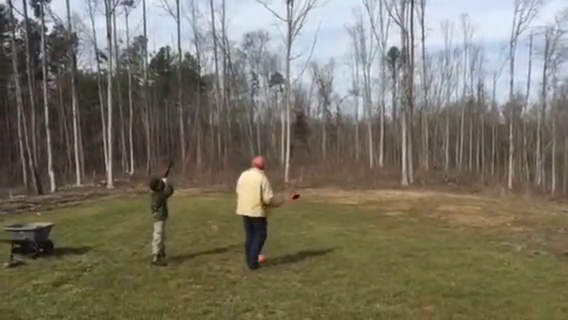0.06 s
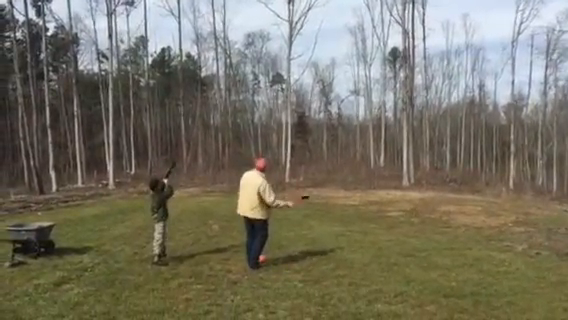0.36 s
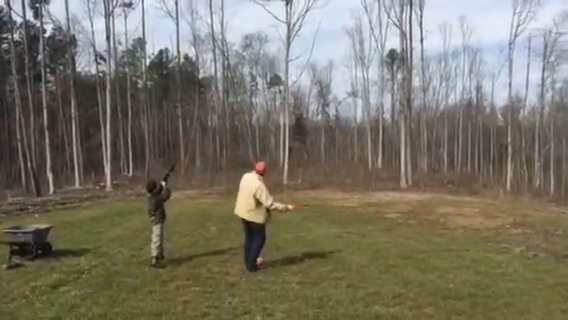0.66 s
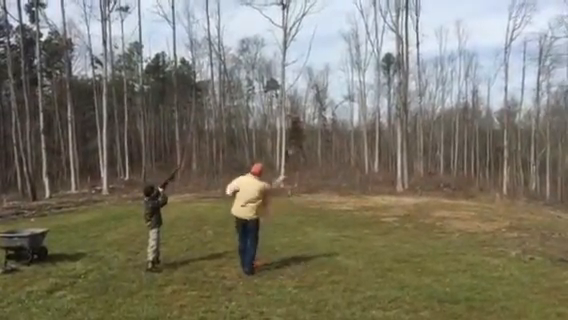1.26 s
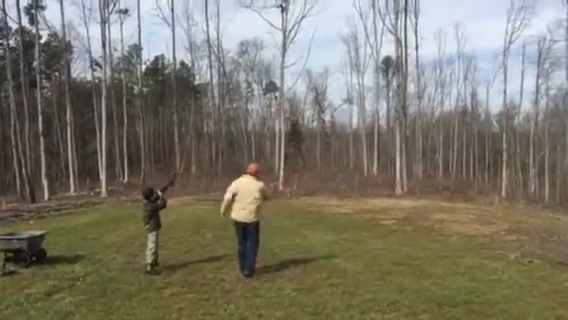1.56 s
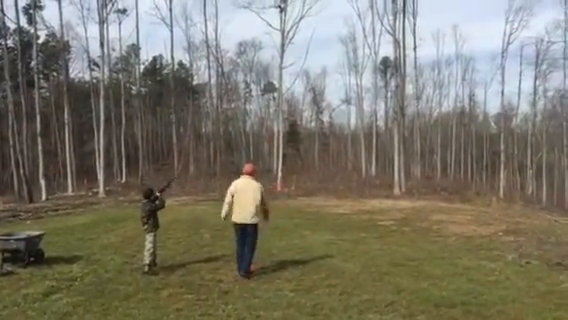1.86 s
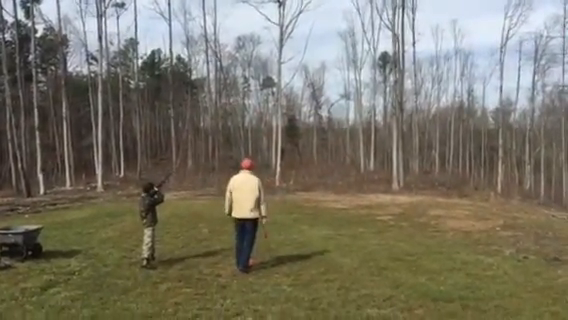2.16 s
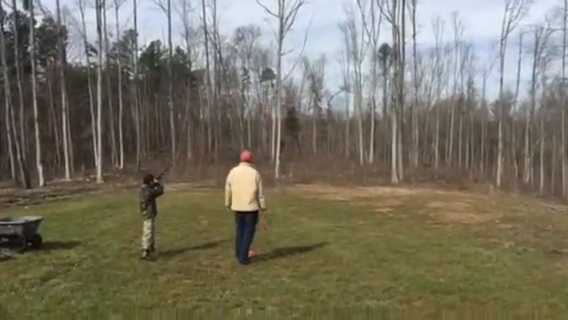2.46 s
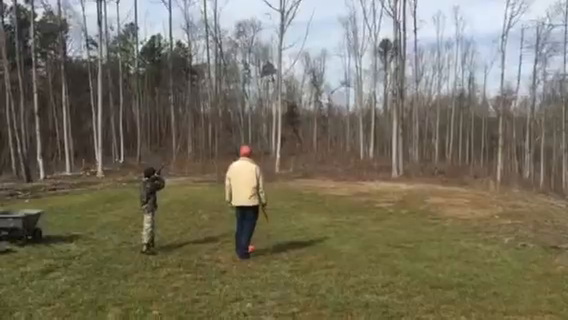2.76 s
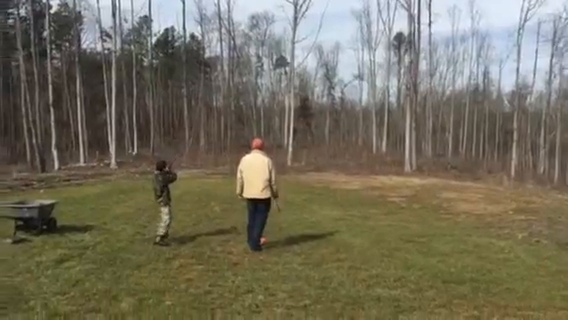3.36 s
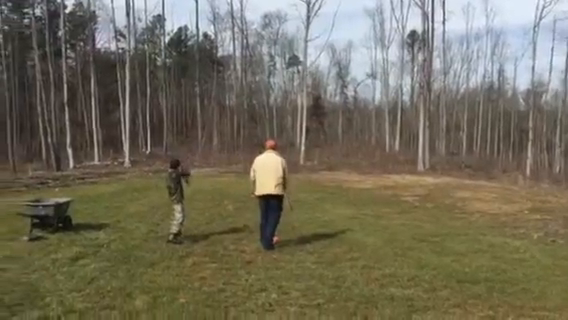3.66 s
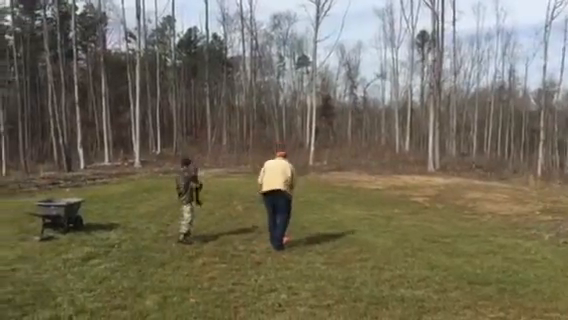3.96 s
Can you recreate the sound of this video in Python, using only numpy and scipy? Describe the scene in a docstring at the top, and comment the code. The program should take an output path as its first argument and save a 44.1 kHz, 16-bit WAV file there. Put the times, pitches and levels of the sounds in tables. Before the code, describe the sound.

A shotgun fires once in a clearing by woods. Before it come light wind, a distant rush and the faint snap of a clay thrower. The blast overloads the microphone, then echoes away through the trees.

```python
"""One shotgun shot in a grass clearing ringed by bare woods.
First come light wind, a far rush with a whine in it, and a tiny bird chirp. At 1.3 s a hand thrower
snaps a clay disc free, and the bird chirps again. At 3.1 s the blast overloads the microphone.
Grass and brush scatter it, the nearest trees slap it back, and then it rolls away through the woods,
ever duller, with a few faint ticks near the end."""
import sys
import numpy as np
from scipy import signal
from scipy.fft import rfft, irfft
from scipy.io import wavfile

SR = 44100
rng = np.random.default_rng(int(sys.argv[2]) if len(sys.argv) > 2 else 0)


def log_audio(samples):
    """Write samples as a 16-bit WAV file to the path given in sys.argv[1]."""
    # one column per channel
    frames = np.atleast_2d(samples).T
    # limit to full scale, then quantise
    limited = np.clip(frames, -1, 1)
    pcm = np.round(limited * 32767).astype(np.int16)
    wavfile.write(sys.argv[1], SR, pcm)


N = 176400   # 4 seconds
TIME = np.arange(N) / SR
SHOT_S = 3.0964   # the shock front arrives


def from_db(db):
    """Turn decibels into a gain."""
    return 10 ** (np.asarray(db) / 20)


def at_hz(points, hz):
    """Read between the rows of a table, on a log frequency scale."""
    return np.interp(np.log(hz + 1e-9), *np.transpose([(np.log(f), v) for f, v in points]))


def noise(spectrum):
    """Noise with the given level per Hz."""
    gain = from_db(at_hz(spectrum, np.arange(N // 2 + 1) * SR / N))
    return irfft(rfft(rng.standard_normal(N)) * gain, N) * np.sqrt(SR / 2)


def unit_power(x):
    """Scale a signal to an average power of 1."""
    return x / np.sqrt(np.mean(x ** 2) + 1e-20)


def drift(rate_hz, step=40):
    """A smooth random wobble, about 1 in size."""
    pole = np.exp(-2 * np.pi * rate_hz * step / SR)
    draws = rng.standard_normal((N + SR) // step)
    slow = signal.lfilter([1], [1, -2 * pole, pole * pole], draws)[SR // step:]
    return np.interp(TIME, np.arange(len(slow)) * step / SR, unit_power(slow))


def since(start):
    """Seconds since a moment, zero before it."""
    return np.maximum(TIME - start, 0)


def burst(start, fade, rise=1e-4, hold=0):
    """A level that rises, then falls once `hold` is over. A fade time is the seconds to fall 60 dB."""
    fall = np.exp(-np.minimum(np.log(1000) * since(start + hold) / fade, 50))
    return np.minimum(since(start) / rise, 1) * fall


def ring(start, hz, fade):
    """A tone that starts sharply and dies away."""
    return burst(start, fade) * np.sin(2 * np.pi * hz * since(start))


def bands(spectrum):
    """Yield noise in half-octave bands, each with its centre in Hz."""
    edges = np.geomspace(30, 17000, 19)
    sources = noise(spectrum), noise(spectrum)
    for k, (low, high) in enumerate(zip(edges, edges[1:])):
        band_pass = signal.butter(2, [low, high], "band", fs=SR, output="sos")
        yield np.sqrt(low * high), signal.sosfilt(band_pass, sources[k % 2])


# The tone of the crack. Each row: frequency in Hz, relative level in dB.
CRACK_TONE = [(150, -24.5), (280, 4.5), (420, -2.5), (700, 3), (1200, -5), (2200, -3.5), (3500, -7),
              (7000, -18.5), (16000, -24.5)]
# Low ringing behind the crack. Each row: pitch in Hz, level in dB, fade time in seconds.
LOW_RINGS = [(420, -7, 0.019), (240, -8, .05)]

def blast():
    """A ragged shock front cracks, then a deep pressure swing slows as it dies."""
    crack = from_db(11) * unit_power(noise(CRACK_TONE)) * burst(SHOT_S, fade=0.0072, hold=0.0029)
    suction_s = 3.1004   # the pressure swings below rest
    start_hz, end_hz, sag_s = 182, 52, 0.0041
    age = since(suction_s)
    cycles = end_hz * age + (start_hz - end_hz) * sag_s * (1 - np.exp(-age / sag_s))
    boom = -from_db(6.5) * burst(suction_s, fade=0.043) * np.sin(2 * np.pi * cycles)
    ringing = sum(from_db(db) * ring(suction_s, hz, fade) for hz, db, fade in LOW_RINGS)
    return crack + boom + ringing


# Two dry ticks. Each row: start in seconds, level in dB, fade time in seconds.
DRY_TICKS = [(3.0743, -25, 0.0083), (3.078, -36.5, 0.0058)]
# Short dull swells. Each row: middle in seconds, pitch in Hz, half length in seconds, level in dB.
SWELLS = [(3.0876, 740, 0.003, -11), (3.0874, 173, 0.0037, -20), (3.0942, 170, 0.0065, -14.5)]
# The tones of the ticks and the rasp. Each row: frequency in Hz, relative level in dB.
TICK_TONE = [(200, -7), (800, 4), (2000, -1.5), (4000, -2.5), (6500, -10.5), (16000, -17.5)]
RASP_TONE = [(100, -18.5), (450, 2), (900, 0.5), (2000, -9), (5000, -20.5), (16000, -37.5)]

def blast_onset():
    """Just ahead of the crack come two ticks, dull swells and a rasp that grows into it."""
    tick_level = sum(from_db(db) * burst(start, fade, hold=0.0007) for start, db, fade in DRY_TICKS)
    ticks = unit_power(noise(TICK_TONE)) * tick_level
    swells = np.zeros(N)
    for middle, hz, half_length, db in SWELLS:
        offset = TIME - middle
        swells += from_db(db) * np.exp(-(offset / half_length) ** 2) * np.cos(2 * np.pi * hz * offset)
    rasp_level = from_db(-16.5) * np.exp(-np.abs(TIME - SHOT_S) / 0.0063)
    return ticks + swells + rasp_level * unit_power(noise(RASP_TONE))


# The tone of sound sprayed back by the ground. Each row: frequency in Hz, relative level in dB.
SPRAY_TONE = [(50, -19), (200, -7.5), (420, 10), (700, 2), (1100, -9.5), (2500, -3), (6000, -5.5),
              (16000, -18.5)]
# Scatter from grass and brush close by. Each row: frequency in Hz, starting level in dB per Hz.
SCATTER_TONE = [(50, -80), (250, -61), (450, -56), (900, -53.5), (1500, -47.5), (2500, -49), (5000, -58),
                (10000, -64), (16000, -66)]
# How long that scatter lasts. Each row: frequency in Hz, fade time in seconds.
SCATTER_FADES = [(100, .6), (800, 0.65), (2000, 0.24), (5000, 0.31), (15000, 0.21)]

def clearing():
    """Ground, grass and brush scatter the blast; the treble dies first."""
    rise_s = 0.011
    ground_level = from_db(-3.5) * burst(SHOT_S, fade=0.079, rise=rise_s)
    brush_level = from_db(-39) * burst(SHOT_S, fade=1.0, hold=0.13)
    spray = (ground_level + brush_level) * unit_power(noise(SPRAY_TONE))
    return spray + sum(band * burst(SHOT_S, at_hz(SCATTER_FADES, hz), rise_s)
                       for hz, band in bands(SCATTER_TONE))


# Echoes from the nearest trees.
# Each row: start in seconds, slap level in dB, thump level in dB, slap fade time in seconds.
TREE_ECHOES = [(3.176, -23.5, -38, .025), (3.205, -24.5, -30, .02), (3.2605, -23, -31, 0.023),
               (3.2636, -16, -43, 0.04), (3.269, -33, -15.5, 0.044), (3.2872, -19, -43, 0.039),
               (3.3028, -11, -12, 0.015), (3.3078, -16, -19, 0.031), (3.3408, -15, -26, 0.031),
               (3.362, -20, -28, 0.035), (3.3719, -16, -19, 0.029), (3.384, -22, -18, 0.02),
               (3.4159, -19.5, -32, .04), (3.43, -23, -29, .04), (3.4469, -22, -36, 0.039),
               (3.454, -20, -44, 0.039), (3.52, -24, -33, 0.034), (3.7175, -30.5, -32, 0.056),
               (3.843, -33, -41, 0.045)]
# The tone of a slap. Each row: frequency in Hz, relative level in dB.
SLAP_TONE = [(150, -19), (450, 0.5), (800, 5.5), (1400, -1.5), (2200, -5), (4000, -16.5), (7000, -25.5),
             (15000, -44.5)]

def tree_echoes():
    """Each stand of trunks returns a sharp front, a noisy slap and a low thump."""
    fronts, slap_level, thumps = np.zeros((3, N))
    for start, slap_db, thump_db, fade in TREE_ECHOES:
        fronts += from_db(slap_db + 1.5) * ring(start, hz=960 * rng.uniform(1, 1.4), fade=0.004)
        slap_level += from_db(slap_db) * burst(start, fade, rise=0.00052, hold=0.00052)
        thumps += from_db(thump_db) * ring(start, hz=236 * rng.uniform(1, 1.04), fade=0.038)
    thumps = signal.sosfilt(signal.butter(2, 130, "high", fs=SR, output="sos"), thumps)
    return fronts + slap_level * unit_power(noise(SLAP_TONE)) + thumps


# The tone of the echo from the edge of the woods. Each row: frequency in Hz, level in dB per Hz.
EDGE_TONE = [(50, -101), (100, -62.5), (160, -57.5), (260, -52), (400, -89), (750, -62.5), (2000, -66.5),
             (5000, -80.5), (10000, -97.5), (16000, -99)]

def woods_edge():
    """The edge of the woods answers with many echoes, merged into one fluttering mass."""
    echoes = noise(EDGE_TONE) * burst(3.335, fade=0.56, rise=0.015, hold=0.112)
    flutter_db = 2.5 * drift(rate_hz=73)
    return echoes * from_db(flutter_db)


# The tone of the roll before the air dulls it. Each row: frequency in Hz, level in dB per Hz.
ROLL_TONE = [(30, -91.5), (60, -81), (130, -68.5), (250, -59.5), (400, -66), (750, -55.5), (1400, -58.5),
             (2200, -60.5), (3500, -70), (5500, -77), (10000, -83), (16000, -85)]
# How the roll swells and sinks. Each row: time in seconds, added level in dB.
ROLL_LEVEL = [(3.15, -28), (3.19, -11), (3.24, -31.5), (3.33, -7.5), (3.38, -8), (3.5, -2.5), (3.62, 1),
              (3.69, 1), (3.76, 0), (3.86, 0.5), (3.94, -0.5), (4.0, -2)]

def deep_woods():
    """Countless far echoes roll on; the longer their path, the more treble the air has taken."""
    air_db_per_s_per_khz = 5.5
    level_db = np.interp(TIME, *np.transpose(ROLL_LEVEL)) + 2.1 * drift(rate_hz=70)
    lost_db_per_hz = air_db_per_s_per_khz * since(SHOT_S) / 1000
    roll = np.zeros(N)
    for hz, band in bands(ROLL_TONE):
        flutter_db = 1.8 * drift(rate_hz=40)
        roll += band * from_db(flutter_db - lost_db_per_hz * hz)
    return roll * from_db(level_db) * (TIME > SHOT_S)


# Faint ticks after the shot. Each row: start in seconds, level in dB, pitch in Hz.
PELLET_TICKS = [(3.703, -60, 10600), (3.828, -59, 11500), (3.861, -59, 9000), (3.923, -55, 10000),
                (3.944, -64, 10500), (3.987, -55, 8000)]

def pellets():
    """Tiny puffs of high noise, perhaps pellets hitting twigs."""
    ticks = np.zeros(N)
    for start, db, hz in PELLET_TICKS:
        hiss = unit_power(noise([(hz / 2, -20), (hz, 0), (hz * 2, -20)]))
        ticks += from_db(db) * burst(start, fade=0.012) * hiss
    return ticks


# The disc's scrapes. Each row: start in seconds, level in dB, rise and fade times in seconds.
DISC_SCRAPES = [(1.297, -59, 0.03, 0.083), (1.328, -52, 0.011, 0.017)]
# The arm's ringing. Each row: pitch in Hz, level in dB relative to the snap, fade time in seconds.
ARM_RINGS = [(2720, -16, 0.26), (2730, -25, .18), (2950, -19, 0.22), (4720, -17, 0.083), (4800, -10, 0.13),
             (5010, -12.5, 0.11), (6089, -15, 0.17)]
# The tones of disc on arm and of the snap's echo. Each row: frequency in Hz, relative level in dB.
CONTACT_TONE = [(500, -36), (1500, -8), (2200, -8), (4500, -0.5), (7000, -2.5), (10000, -13.5),
                (16000, -16)]
SNAP_ECHO_TONE = [(1500, -8), (3000, 1), (5000, 0), (8000, -10), (16000, -22)]

def clay_thrower():
    """The disc scrapes along the arm and snaps free; the arm rings and the trees echo faintly."""
    snap_s, snap_db = 1.3412, -36
    scrape_level = sum(from_db(db) * burst(start, fade, rise, hold=rise)
                       for start, db, rise, fade in DISC_SCRAPES)
    snap_level = from_db(snap_db) * burst(snap_s, fade=0.042, hold=0.0013)
    arm = sum(from_db(snap_db + db) * ring(snap_s, hz, fade) for hz, db, fade in ARM_RINGS)
    echo = from_db(-59.5) * unit_power(noise(SNAP_ECHO_TONE)) * burst(snap_s, fade=0.54)
    return (scrape_level + snap_level) * unit_power(noise(CONTACT_TONE)) + arm + echo


# Two chirps. Each row: start in seconds, length in seconds, level in dB.
BIRD_CHIRPS = [(.444, .022, -71.5), (1.9, .03, -67)]

def bird():
    """A small bird's thin whistles glide up and level off."""
    start_hz, top_hz, glide_s = 6400, 7900, 0.013
    chirps = np.zeros(N)
    for start, length, db in BIRD_CHIRPS:
        hz = top_hz + (start_hz - top_hz) * np.exp(-since(start) / glide_s)
        level = from_db(db) * np.sin(np.pi * np.minimum(since(start) / length, 1))
        chirps += level * np.sin(2 * np.pi * np.cumsum(hz) / SR)
    return chirps


# The tone of the wind. Each row: frequency in Hz, level in dB per Hz.
WIND_TONE = [(15, -91), (30, -94.5), (55, -65.5), (80, -73), (120, -76), (200, -93), (500, -110),
             (2000, -140)]
# How the wind rises and drops. Each row: time in seconds, added level in dB.
WIND_STRENGTH = [(0, -0.5), (.4, 2.5), (.8, 1.5), (1.3, 2), (1.8, -3.5), (2.1, -1), (2.6, 2.5), (3.0, -4.5),
                 (4.0, -5.5)]

def wind():
    """Light wind rumbles on the microphone in uneven gusts."""
    level_db = np.interp(TIME, *np.transpose(WIND_STRENGTH))
    gust_db = 2 * drift(rate_hz=5)
    return noise(WIND_TONE) * from_db(level_db + gust_db)


# The path of a far whine. Each row: time in seconds, pitch in Hz, level in dB.
WHINE_PATH = [(0, 891, -59), (.27, 897, -54), (.55, 862, -64.5), (1.201, 890, -62.5), (1.75, 879.5, -63),
              (2.25, 807, -60.5), (2.75, 876, -59.5), (4.0, 888, -67)]
# The tone of the far rush. Each row: frequency in Hz, level in dB per Hz.
RUSH_TONE = [(100, -83.5), (280, -82.5), (420, -91.5), (620, -83), (860, -80.5), (1200, -86), (1700, -94.5),
             (2500, -107), (4000, -117), (7000, -120), (11000, -124), (16000, -125)]

def far_rush():
    """A nearly steady rush with a wavering whine in it, perhaps tyres on a road."""
    times, hz, db = np.transpose(WHINE_PATH)
    phase = 2 * np.pi * np.cumsum(np.interp(TIME, times, hz)) / SR
    # Two random wobbles blur the pure tone into a narrow band of noise.
    whine = drift(rate_hz=22) * np.cos(phase) + drift(rate_hz=22) * np.sin(phase)
    rush = noise(RUSH_TONE) * from_db(0.5 * drift(rate_hz=1.6))
    return rush + whine * from_db(np.interp(TIME, times, db))


def scene():
    """Add up everything at one microphone."""
    shot = blast() + blast_onset()
    echoes = clearing() + tree_echoes() + woods_edge() + deep_woods()
    return (shot + echoes + pellets() + clay_thrower() + bird() + wind() + far_rush())[None]


def record(dry):
    """The microphone loses the deepest bass, flattens the blast by overload and cuts the top treble."""
    low_cut_hz, high_cut_hz, largest_swing = 12, 16600, 0.66
    thinned = signal.sosfilt(signal.butter(1, low_cut_hz, "high", fs=SR, output="sos"), dry)
    flattened = thinned / (1 + (thinned / largest_swing) ** 4) ** (1 / 4)
    return signal.sosfilt(signal.cheby2(16, 60, high_cut_hz, fs=SR, output="sos"), flattened)


dry = scene()
out = record(dry)
log_audio(out)
```